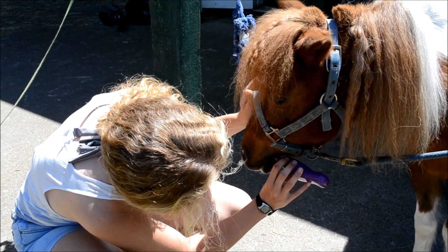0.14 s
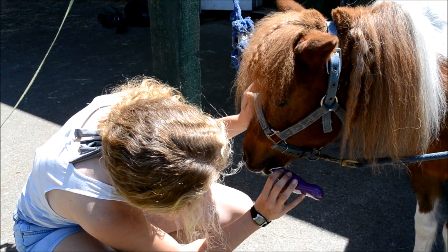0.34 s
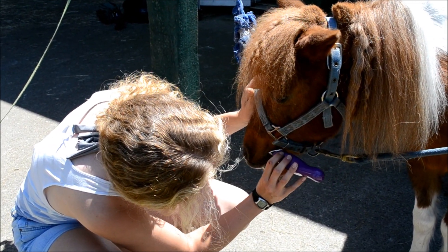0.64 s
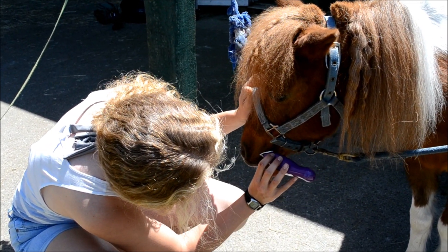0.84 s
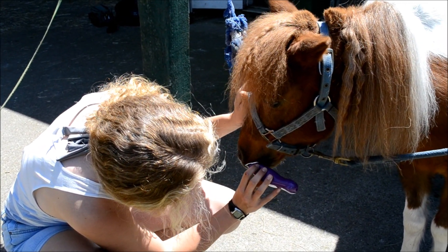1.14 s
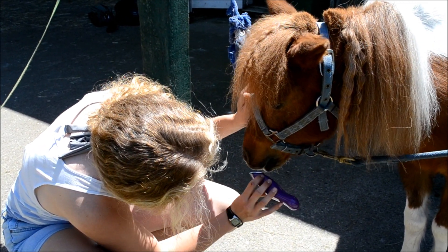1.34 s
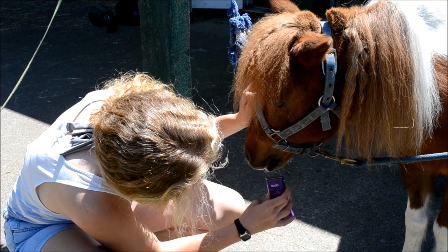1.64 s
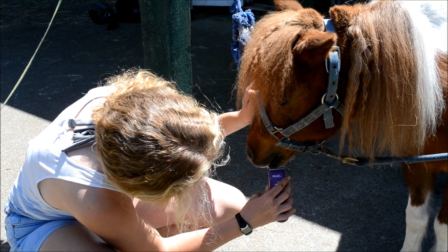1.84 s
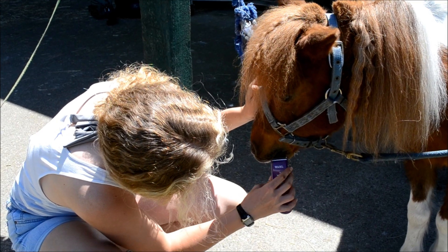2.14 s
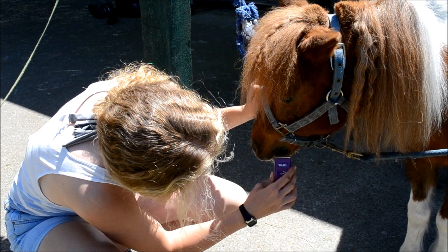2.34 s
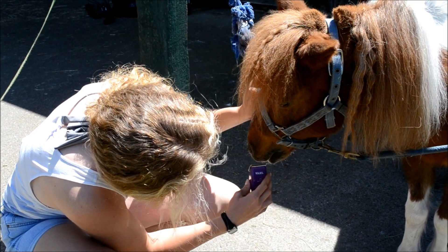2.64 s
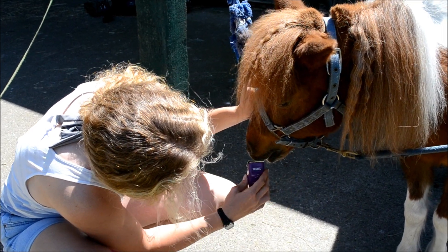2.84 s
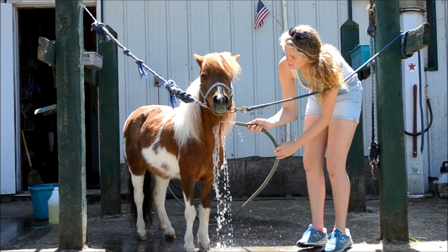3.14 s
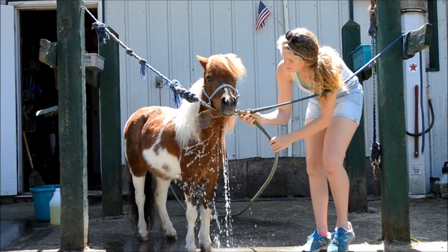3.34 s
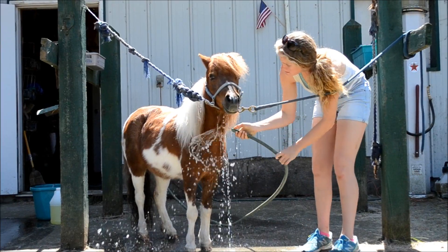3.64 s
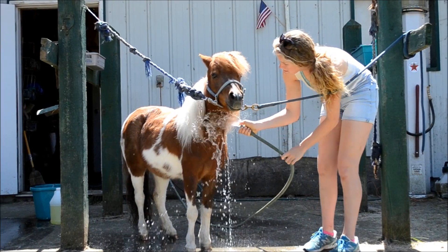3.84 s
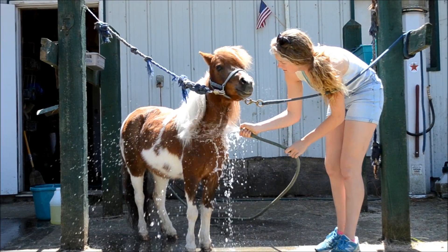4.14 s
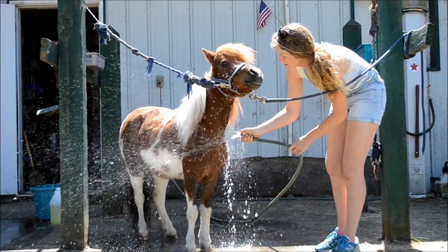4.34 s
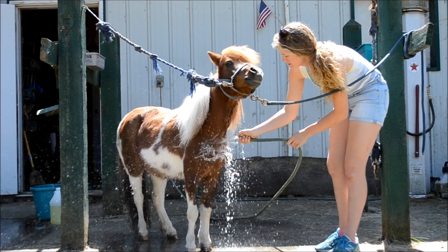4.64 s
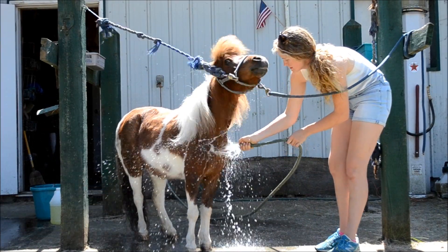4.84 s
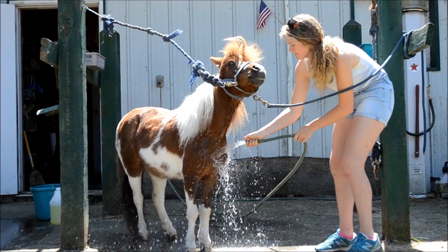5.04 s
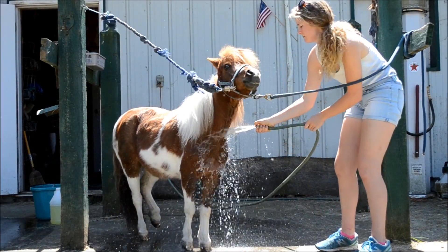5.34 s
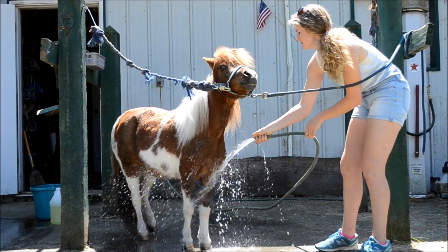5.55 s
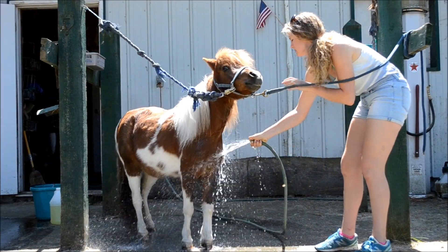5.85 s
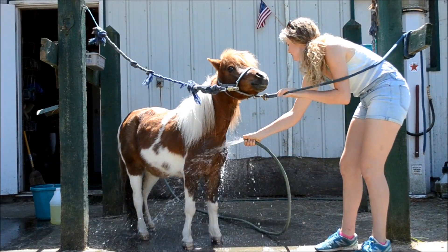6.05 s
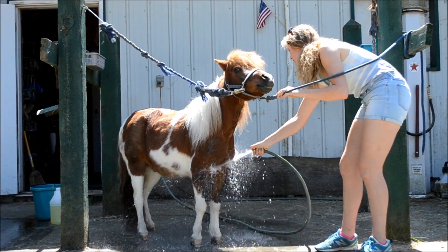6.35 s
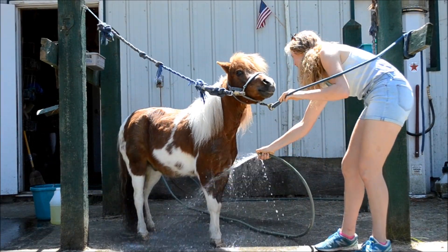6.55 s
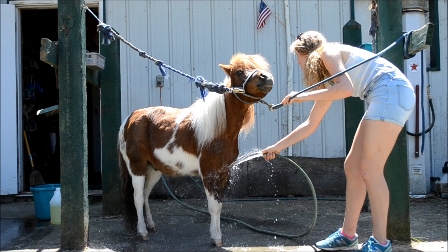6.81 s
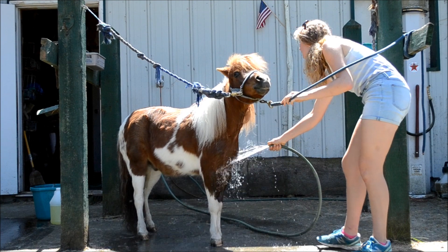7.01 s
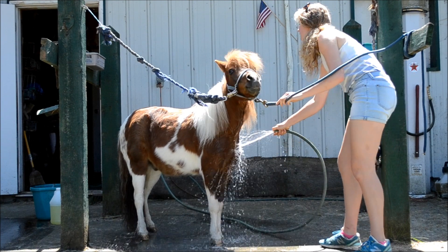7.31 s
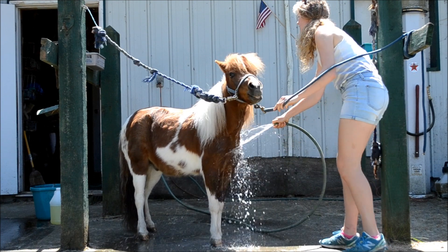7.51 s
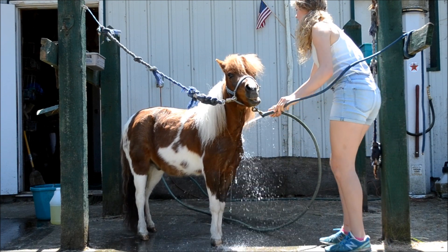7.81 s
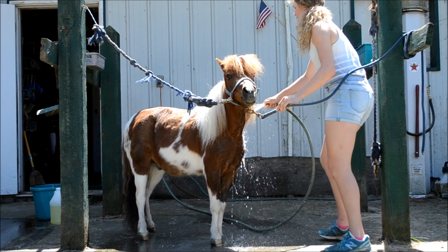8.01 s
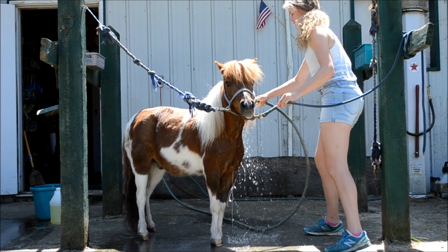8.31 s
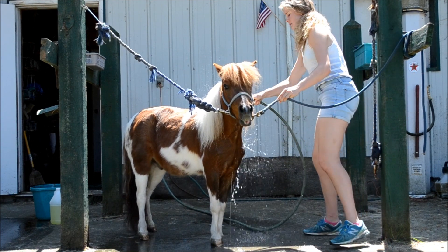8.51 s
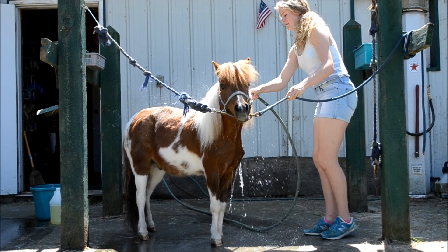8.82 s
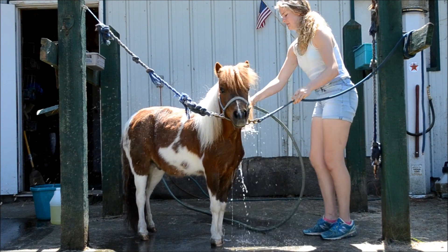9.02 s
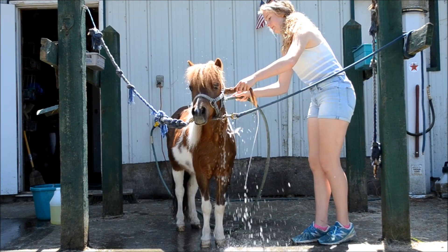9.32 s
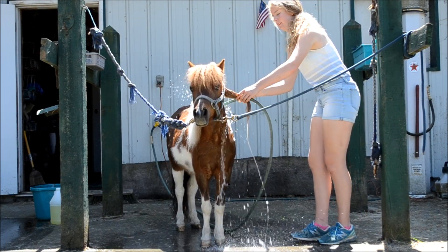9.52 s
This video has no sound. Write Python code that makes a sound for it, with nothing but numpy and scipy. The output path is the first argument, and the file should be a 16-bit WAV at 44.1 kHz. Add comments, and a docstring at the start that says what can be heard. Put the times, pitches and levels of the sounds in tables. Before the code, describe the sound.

Close up, small electric clippers buzz with a steady metallic, nasal tone, brightening when turned upright, with faint rasping snips of hair. At about three seconds a hard cut brings a hose washing a pony outdoors beside a barn: bright spatter, soft drumming on the coat, water slapping concrete. The spray thins later, with a hollow running-water rush, then heavier splashes at the end. Quiet yard noise lies underneath.

```python
"""Small electric clippers buzz at a pony's muzzle, first sideways, then upright: knocks ring the tool, hair rasps.
At about 3 s the scene cuts to the barn's wash stand. A hose drums on the coat and breaks into random droplets;
gouts and sheets of water land as short bursts of noise, with a brief answer from the barn wall. Later come
two soft thuds, a faint distant hum made from one unsteady sine, and the hollow noise of running water.
A quiet yard noise lies under it all."""
import sys
import numpy as np
from scipy import signal
from scipy.fft import rfft, irfft, next_fast_len
from scipy.io import wavfile
from scipy.ndimage import uniform_filter1d, map_coordinates

SR = 44100
rng = np.random.default_rng(int(sys.argv[2]) if len(sys.argv) > 2 else 0)


def unload_wav(signal):
    """Save mono or channel-first audio to the path in sys.argv[1] as 16-bit WAV at rate SR, clipped to [-1, 1]."""
    wavfile.write(
        sys.argv[1],
        SR,
        np.round(np.clip(np.atleast_2d(signal).T, -1, 1) * 32767).astype(np.int16),
    )


N = 426447

CUT_S = 2.975  # the clippers give way to the hose
# how fast the blade goes back and forth: start_s, strokes_hz
STROKE_RATE = [(0.0, 105.6), (0.27, 106.7), (0.42, 107.1), (0.93, 106.1), (1.08, 106.3), (1.91, 107.1),
               (1.95, 106.5), (2.09, 106.9), (2.15, 106.1), (2.37, 107), (2.97, 106.8)]
FIRST_RATE_HZ = STROKE_RATE[0][1]
# level of the spray that the jet throws up: start_s, level_db
SPRAY_FLOW = [(2.98, -44.5), (3.4, -45), (3.76, -48.5), (4.3, -42), (4.58, -47), (4.9, -41.5), (5.36, -45),
              (5.47, -48), (5.52, -50.5), (5.66, -42.5), (6.0, -46.5), (6.45, -45.5), (6.86, -53.5),
              (6.98, -53.5), (7.3, -47.5), (7.7, -48.5), (7.84, -54.5), (8.33, -50.5), (8.8, -55),
              (9.35, -49), (9.66, -50.5)]


def amp(db):
    """Turn decibels into a gain."""
    return 10 ** (np.asarray(db) / 20)


def unit(x):
    """Scale a sound to an average (rms) level of 1."""
    return x / np.sqrt(np.mean(x ** 2) + 1e-20)


def steady(x, seconds):
    """Even a sound out to a running rms of 1."""
    power = np.abs(uniform_filter1d(x ** 2, int(seconds * SR)))
    return x / np.sqrt(power + 1e-12)


def along(points, hz):
    """Read a curve of (pitch_hz, value) points, with pitch on a log scale."""
    point_hz, value = np.transpose(points)
    return np.interp(np.log(hz + 1), np.log(point_hz + 1), value)


def clock():
    """Time of every sample in seconds."""
    return np.arange(N) / SR


def curves(rows):
    """Join the rows of a table into one smooth-running value per sample for each column after the time."""
    start_s, *columns = np.transpose(rows)
    return [np.interp(clock(), start_s, column) for column in columns]


def wobble(rate):
    """A smooth random curve that passes through `rate` random points a second."""
    knots = rng.standard_normal(4096)
    position = np.arange(0, N, 8) * rate / SR
    return np.repeat(map_coordinates(knots, [position], mode="wrap"), 8)[:N]


def filtered(x, response):
    """Multiply each frequency of a sound by a gain."""
    size = next_fast_len(N + 8192)
    gain = response(np.fft.rfftfreq(size, 1 / SR))
    return irfft(rfft(x, size) * gain, size)[:N]


def coloured(x, spectrum):
    """Shape a sound by a spectrum, then set its rms to 1."""
    return unit(filtered(x, lambda hz: amp(along(spectrum, hz))))


def noise(spectrum):
    """Random noise with a given spectrum, at rms 1."""
    return coloured(rng.standard_normal(N), spectrum)


def add(track, start_s, sound):
    """Mix a sound into a track."""
    part = track[round(start_s * SR):][:len(sound)]
    part += sound[:len(part)]


def swell(middle_s, length_s):
    """A smooth rise and fall that peaks at 1."""
    return np.exp(-np.minimum((2 * (clock() - middle_s) / length_s) ** 2, 60))


def burst(pitch_hz, width, t60, tail_db, tail_t60):
    """A sharp smack of peak 1 made of fading, band-filtered noise, with a brighter crackling tail."""
    t = np.arange(4096) / SR
    hz = np.fft.rfftfreq(len(t), 1 / SR)

    def band(centre, spread):
        return 1j * hz * spread * centre / (centre * centre - hz * hz + 1j * hz * spread * centre)

    smack, tail, grain = rng.standard_normal((3, len(t)))
    fading_noise = smack * amp(-60 * t / t60)  # 60 dB down after t60 seconds
    smack = irfft(rfft(fading_noise) * band(pitch_hz, width) * band(pitch_hz, 0.84))
    tail = unit(irfft(rfft(tail * amp(1.3 * grain)) * band(1.15 * pitch_hz, 0.57) ** 2))
    return smack / np.abs(smack).max() + amp(tail_db - 60 * t / tail_t60) * tail


def stroke_phases(ring_s, return_db, return_share):
    """Phases of one cycle: the blade knocks at the end of its stroke and more softly on its way back."""
    cycle = np.arange(4096) / 4096

    def ring(start):
        return np.exp(-((cycle - start) % 1) / (ring_s * FIRST_RATE_HZ))

    knocks = ring(0) + amp(return_db) * ring(return_share)
    return np.angle(rfft(knocks * rng.standard_normal(len(cycle))))


def facing_away(upright, edge_on):
    """1 while a part is edge-on, below 0 in the lobe where its other side beams out."""
    width = 0.043  # half-width, in pose from 0 to 1
    lobe_pose, lobe_share = 0.12, 0.28  # how far past edge-on, and share of the edge-on change

    def bump(pose):
        return np.exp(-((upright - pose) / width) ** 2)

    return bump(edge_on) - lobe_share * bump(edge_on + lobe_pose)


def fading(buzz, moving):
    """Each harmonic swells and fades on its own as the tool moves, faster in a brisk move."""
    depth_db, fades_per_s = 2.2, 3.5  # random depth; rate at the average movement
    hz, t, z = signal.stft(buzz, SR, nperseg=2048)
    pace = moving / moving[:round(CUT_S * SR)].mean()
    travel = np.interp(t, clock(), np.cumsum(pace) / SR)
    place = np.meshgrid(hz / FIRST_RATE_HZ, fades_per_s * travel, indexing="ij")
    field = map_coordinates(rng.standard_normal((256, 128)), place, mode="wrap", order=2)
    faded = signal.istft(z * amp(depth_db * field), SR, nperseg=2048)[1][:N]
    return unit(faded) * buzz.std()


def hair(turns, upright):
    """Hair is sheared once a stroke: a faint noisy rasp that swells at every whisker."""
    # whiskers snipped: middle_s, level_db, length_s
    snips = [(0.027, -50, 0.069), (0.108, -46, 0.03), (0.203, -53, 0.1), (0.24, -53, 0.028),
             (0.54, -51, 0.04), (0.802, -50, 0.053), (0.871, -50, 0.04), (0.936, -54, 0.028),
             (.99, -54, .03), (1.225, -52, 0.042), (2.144, -52, 0.022), (2.192, -49, .03),
             (2.255, -57, .03)]
    # colour of the rasp: pitch_hz, level_db (per Hz)
    hair_colour = [(400, -24), (1000, -3), (1700, 4.5), (2400, -3), (3300, -0.5), (4500, -10),
                   (7000, -14.5), (11000, -28)]
    rasp = amp(-56.5 - 6.5 * upright)
    cutting = rasp + sum(amp(db) * swell(s, length) for s, db, length in snips)
    shear = unit(0.69 + np.exp(-(turns % 1) / 0.87)) * amp(1.4 * wobble(150))
    out = cutting * shear * noise(hair_colour)
    # one thick whisker snaps
    add(out, 2.2115, amp(-26.5) * burst(2800, width=.3, t60=.007, tail_db=-39.13, tail_t60=.03))
    return out


def clippers():
    """The blade's knocks ring housing and steel; turning the tool changes which parts face the listener."""
    # how the tool is held: start_s, upright (0 sideways to 1 upright)
    pose = [(0, 0.22), (1.33, .33), (1.48, 0.58), (1.56, 0.63), (1.68, 0.75), (1.9, 0.83), (2.42, 0.9),
            (2.58, 0.82), (2.97, .86)]
    # how much the hand moves: start_s, movement (0 still to 1 brisk)
    hand = [(0, 0.41), (1.05, 0.49), (1.42, 0.78), (1.6, 0.88), (1.9, 0.43), (2.3, 0.34), (2.46, 1),
            (2.73, 0.66), (2.92, 0.96)]
    # level of the plastic body's ring: start_s, level_db
    body = [(.1, 1), (.5, 0), (1.0, 1), (1.28, 3.5), (1.5, 1), (1.75, -1.5), (2.1, 1), (2.42, 4.5),
            (2.57, -.5), (2.97, 1.5)]
    # limits of the pitch band that each part rings in: pitch_hz
    part_edges = [50, 1100, 1650, 2400, 3800, 5300, 12000]
    # motor, housing, cover, blade, comb, teeth: sideways_db, upright_db, brisk_move_db,
    # body_share (of the body's ring), edge_on (pose), edge_on_db (level change when edge-on)
    parts = [(-54, -52.5, -0.5, 0, .5, 2), (-39, -51.5, 0, 0.96, .5, 2),
             (-41.5, -51, 1, 0.57, 0.646, -11.5), (-48, -47.5, 3, 0.38, 0.543, -5),
             (-62, -57.5, 11.5, 0, 0.6, -2), (-56.5, -56, 1.5, 0, 0.725, -3.5)]
    # ring of the housing in each pose: multiple (of the stroke rate), level_db
    sideways_ring = [(1, -27), (2, -43), (3, -22), (4, -20), (5, -21), (6, -15.5), (7, -1), (8, -12),
                     (9, -26), (10, -7.5), (11, 2.5), (12, 12), (13, 12), (14, 14.5), (15, 7), (16, -5),
                     (17, -3.5), (18, 7.5), (19, -16), (20, -18), (21, -27), (22, -33), (23, -18), (24, -9),
                     (25, -30), (26, -7), (27, -0.5), (28, -6), (29, -9), (30, -21), (31, 4.5), (32, -5)]
    upright_ring = [(1, -26.5), (2, -29), (3, -16), (4, -28), (5, -16), (6, -11), (7, 1), (8, -9), (9, 0.5),
                    (10, -24), (11, 3), (12, 4.5), (13, -6), (14, 11.5), (15, 11), (16, 12), (17, 11.5),
                    (18, 15.5), (19, 13.5), (20, 16.5), (21, 15), (22, -17), (23, -10.5), (24, -10),
                    (25, -12), (26, -9.5), (27, -1.5), (28, -5), (29, -4.5), (30, -6.5), (31, 2), (32, 1.5)]
    # ring of the steel above that in each pose: pitch_hz, level_db
    sideways_steel = [(3450, 1), (3750, -11), (4100, -30), (4300, -32), (4560, -13), (4690, -9),
                      (4900, -35), (5250, -14), (5700, -37), (6300, -19), (6850, -33), (7130, -18),
                      (7500, -27), (9500, -25.5)]
    upright_steel = [(3450, -10), (3950, -10.5), (4290, 0.5), (4530, -26), (4900, -10), (5350, -26.5),
                     (5900, -14), (6200, -18.5), (6900, -18), (7400, -33), (8750, -23.5), (9100, -25),
                     (9500, -22), (11000, -28)]

    rate, upright = curves(STROKE_RATE)[0], np.clip(curves(pose)[0], 0, 1)
    moving, body_db = curves(hand)[0], curves(body)[0]
    live = clock() < CUT_S + .1
    # strokes so far, with a little unsteadiness
    turns = np.cumsum(rate * (1 + .0004 * wobble(20))) / SR + .00017 * wobble(110)
    phases = stroke_phases(ring_s=.0017, return_db=-6, return_share=.72)
    k = np.arange(len(phases))
    hz = k * FIRST_RATE_HZ
    # reflections off muzzle, hand and ground, whose paths drift most while the tool moves
    echoes = []
    for delay_s in (.0007, .0016, .0029):
        path_s = delay_s + .00008 * moving * wobble(4.5)
        echoes.append((turns - rate * path_s)[live])

    def read(cycle, at):
        return np.interp(at % 1, np.arange(len(cycle)) / len(cycle), cycle)

    poses = ((sideways_ring, sideways_steel, 1 - upright), (upright_ring, upright_steel, upright))
    buzz = np.zeros(N)
    for lo, hi, row in zip(part_edges, part_edges[1:], parts):
        side_db, up_db, move_db, body_share, edge_on, edge_on_db = row
        facing_db = side_db + (up_db - side_db) * upright + edge_on_db * facing_away(upright, edge_on)
        level_db = facing_db + move_db * moving + body_share * body_db
        # each part takes the knock at its own point of the cycle
        lag = .07 * np.log2(lo / part_edges[3])
        reflect = .37 * min(lo / part_edges[3], 1)  # low parts reflect less
        part = 0
        for housing, steel, share in poses:
            order, order_db = np.transpose(housing)
            ring_db = np.where(k <= order[-1], np.interp(k, order, order_db), along(steel, hz))
            in_band = (hz >= lo) * (hz < hi)
            cycle = irfft(amp(ring_db) * in_band * np.exp(1j * (phases - 2 * np.pi * k * lag)))
            reflected = sum(read(cycle, echo) for echo in echoes)
            part = part + share[live] * unit(read(cycle, turns[live]) + reflect * reflected)
        buzz[live] += amp(level_db[live]) * steady(part, .047)
    return fading(buzz, moving) + hair(turns, upright)


def yard(washing):
    """The quiet yard is a slowly wavering noise, 2 dB louder once the washing begins."""
    # colour of the yard: pitch_hz, level_db (per Hz)
    yard_colour = [(25, -23), (50, -12), (80, -4.5), (110, -3), (200, -5.5), (330, -4.5), (600, -5),
                   (1000, -10), (2000, -10.5), (5000, -12), (11000, -21)]
    return amp(-57.5 + 2 * washing + 0.89 * wobble(3.2)) * noise(yard_colour)


def droplets(spectrum, pitch_hz, cycles, spread_db, clump_db, wash_db, count):
    """Many tiny damped rings of unequal size, arriving in clumps over a wash of finer spray."""
    when, pitch, size = rng.random((count, 3)).T
    t = np.arange(160) / SR
    # up to an octave either side of the pitch
    hz = np.clip(pitch_hz * 2 ** (2 * pitch[:, None] - 1), 100, SR / 3)
    size = amp(spread_db * np.minimum(-np.log(1 - size), 3))
    rings = size[:, None] * np.sin(2 * np.pi * hz * t) * np.exp(-hz * t / cycles)
    where = (when * N).astype(int)[:, None] + np.arange(len(t))
    grains = coloured(np.bincount(where.ravel(), rings.ravel(), N)[:N], spectrum)
    return steady(amp(clump_db) * (grains + amp(wash_db) * noise(spectrum)), 0.089)


def spray():
    """The jet drums on the coat and breaks up into splash, spatter and fine mist; sweeps and gushes swell it."""
    # the jet sweeps across the wet coat: middle_s, level_db, length_s, drum_db (drumming against splash)
    sweeps = [(3.193, -49.5, 0.037, -16), (3.32, -43.5, 0.04, -16), (3.854, -68, .06, -18),
              (4.23, -47, 0.15, -9), (4.43, -54, 0.16, -5.5), (4.906, -45, 0.075, -14),
              (5.068, -53.5, 0.18, -11), (5.342, -49.5, 0.2, -10), (5.678, -60, 0.094, 5.5),
              (5.872, -46.5, 0.15, -12), (6.09, -48, 0.22, -7), (6.306, -43, 0.13, -7),
              (6.746, -53.5, 0.2, -6), (7.123, -51.5, 0.27, -12), (7.302, -59.5, 0.21, -9),
              (7.542, -48, 0.071, -13), (7.65, -52.5, 0.11, -6), (8.103, -54, 0.36, -11),
              (8.39, -60, 0.13, -2), (8.66, -58, 0.3, -6), (8.91, -53, 0.38, -9),
              (9.137, -50.5, 0.085, -8.5)]
    # the coat sheds a gush onto the concrete: middle_s, level_db, length_s, mist_db (against spatter)
    gushes = [(3.218, -39, 0.054, -13), (3.264, -36, 0.023, 1), (3.866, -39.5, 0.066, -3.5),
              (4.315, -38, 0.037, -10), (4.782, -39, 0.056, -8), (5.025, -49, .04, 9),
              (5.105, -40.5, 0.049, -1), (5.266, -41, 0.066, -4), (5.434, -44.5, 0.11, 4.5),
              (5.61, -47.5, 0.1, 7.5), (5.714, -50, 0.087, 7), (6.12, -43.5, 0.14, 4.5),
              (6.32, -43.5, 0.13, 4), (6.532, -42, 0.058, 3.5), (6.75, -58, 0.031, 16),
              (7.383, -56, 0.056, 13.5), (7.597, -45.5, 0.085, 0), (7.776, -42.5, 0.043, 0),
              (7.895, -50.5, 0.047, 3), (8.01, -45, .05, -5), (8.407, -43, 0.054, -4),
              (8.664, -44, 0.1, -3), (8.963, -51, 0.089, -4), (9.226, -46.5, 0.12, 0),
              (9.368, -40.5, 0.12, -2), (9.556, -43.5, 0.027, 2), (9.643, -38, 0.035, 0)]
    # colours of the drumming and the three kinds of drop: pitch_hz, level_db (per Hz)
    drum_colour = [(25, -45), (80, -12), (170, -2.5), (320, -3), (550, 0), (900, -26), (1800, -51)]
    splash_colour = [(100, -55), (350, -29), (650, -11.5), (1050, -5.5), (1700, -3.5), (2400, -7.5),
                     (4000, -15.5)]
    spatter_colour = [(200, -50), (1000, -10), (2000, -7), (2800, 0), (5000, 5), (6500, 5.5), (9000, -10.5)]
    mist_colour = [(800, -61), (3500, -19), (5500, -11.5), (6800, -6.5), (9300, -0.5), (10300, -2),
                   (11500, -4)]
    sweep_spray_db = -6.5  # spray thrown off by a sweep

    flow = amp(curves(SPRAY_FLOW)[0] + 1.33 * wobble(16))
    coat = np.sqrt(sum((amp(db) * swell(s, length)) ** 2 for s, db, length, _ in sweeps))
    flank = sum(amp(db + drum_db) * swell(s, length) for s, db, length, drum_db in sweeps)
    spatter_power = mist_power = flow ** 2 + (amp(sweep_spray_db) * coat) ** 2
    for s, db, length, mist_db in gushes:
        gush = amp(db) * swell(s, length)
        spatter_power = spatter_power + gush ** 2
        mist_power = mist_power + (amp(mist_db) * gush) ** 2
    clumps = wobble(380) + 0.71 * wobble(120)  # drops of all sizes land together

    drum_level = np.hypot(flank, amp(-25.5) * flow) * amp(2.5 * wobble(7.1))
    drum = drum_level * noise(drum_colour)
    splash_level = amp(4.0) * np.hypot(coat, amp(-13.5) * flow)
    splash = splash_level * droplets(splash_colour, pitch_hz=1320, cycles=1.16, spread_db=8,
                                     clump_db=0.83 * clumps, wash_db=4.5, count=9000)
    spatter_level = amp(0.5) * np.sqrt(spatter_power)
    spatter = spatter_level * droplets(spatter_colour, pitch_hz=3730, cycles=2.16, spread_db=5.0,
                                       clump_db=2.63 * clumps, wash_db=-2.0, count=5500)
    mist_level = amp(2.5) * np.sqrt(mist_power)
    mist = mist_level * droplets(mist_colour, pitch_hz=7080, cycles=2.2, spread_db=5.0,
                                 clump_db=1.93 * clumps, wash_db=0, count=14000)
    return drum + splash + spatter + mist


def small_gouts(count):
    """Lesser gouts land at random, harder when there is more spray: start_s, peak_db, pitch_hz."""
    mean_db, follows = -27.5, 0.91  # mean peak, and dB per dB of spray
    middle_hz, octaves = 5260, 0.55  # pitch, and its spread either way
    when, pitch = rng.random((count, 2)).T
    start_s = CUT_S + when * (N / SR - CUT_S)
    flow_db = np.interp(start_s, *np.transpose(SPRAY_FLOW))
    peak_db = mean_db + follows * (flow_db - flow_db.mean())
    return list(zip(start_s, peak_db, middle_hz * 2 ** (octaves * (2 * pitch - 1))))


def slaps():
    """Water running off the pony lands in gouts, each with a duller thump and a throw of droplets."""
    # big gouts slapping the concrete: start_s, peak_db (of the smack), pitch_hz
    big_gouts = [(2.9934, -22.5, 2065), (3.1038, -22.5, 3730), (3.1752, -24, 8830), (3.1903, -22, 6600),
                 (3.257, -25, 6680), (3.303, -23.5, 2930), (3.3215, -15.5, 6750), (3.384, -18, 8550),
                 (3.481, -21.5, 6960), (3.5667, -16.5, 9900), (3.5909, -21.5, 3180), (3.6479, -16.5, 5800),
                 (3.695, -18, 6400), (3.7395, -17.5, 5570), (3.7723, -22, 7110), (3.8066, -17.5, 8900),
                 (3.8185, -13.5, 3000), (3.877, -23, 2600), (3.903, -18.5, 5230), (3.9706, -19, 6170),
                 (4.0157, -24, 2760), (4.0647, -22, 8480), (4.1074, -23, 4850), (4.1632, -18, 2390),
                 (4.2078, -27, 2980), (4.2676, -17, 8850), (4.3118, -19, 2370), (4.4407, -16.5, 5300),
                 (4.562, -16.5, 9100), (4.638, -23.5, 4820), (4.7621, -19, 6940), (4.79, -19.5, 6200),
                 (4.8474, -19, 5240), (4.9437, -20.5, 2800), (4.996, -22.5, 2350), (5.0888, -19, 5000),
                 (5.1822, -18, 3760), (5.231, -21, 4930), (5.3278, -18, 8660), (5.7279, -17.5, 5030),
                 (5.8034, -25, 3870), (6.1676, -24.5, 4280), (6.363, -24, 2850), (6.509, -19.5, 6240),
                 (6.9365, -28.5, 3130), (7.4467, -22, 8800), (7.575, -18, 2140), (7.584, -19.5, 2870),
                 (7.5996, -22.5, 3480), (7.7533, -26.5, 2800), (7.895, -24, 5860), (8.079, -25, 3140),
                 (8.209, -21.5, 5000), (8.262, -24.5, 3000), (8.307, -23, 4000), (8.3285, -23, 5430),
                 (8.3697, -21.5, 5830), (8.6367, -18.5, 3560), (8.7345, -23.5, 8400), (8.7997, -28, 6970),
                 (8.9366, -20.5, 7500), (8.963, -19, 4200), (8.9776, -19.5, 2730), (9.212, -20, 2630),
                 (9.2936, -17, 6640), (9.314, -17.5, 9370), (9.3633, -14.5, 3740), (9.387, -15, 8840),
                 (9.4485, -16, 6500), (9.4548, -16.5, 4740), (9.528, -11.5, 3860), (9.605, -22, 6050)]
    out = np.zeros(N)
    for s, db, pitch_hz in big_gouts + small_gouts(count=55):
        # the crackling tail is the throw of droplets
        smack = burst(pitch_hz, width=0.51, t60=0.0065, tail_db=-18.63, tail_t60=0.024)
        thump = burst(.5 * pitch_hz, width=0.32, t60=0.0074, tail_db=-47.13, tail_t60=.03)
        add(out, s + .0006, amp(db) * (smack + amp(-16.5) * thump))
    return out


def swashes():
    """Sheets of water hit wet hair and puddles with a hollow, crackling swish of noise."""
    # sheets of water: middle_s, level_db, pitch_hz, length_s
    sheets = [(2.996, -41, 1875, 0.024), (3.821, -31, 2200, 0.0051), (3.843, -35, 2930, 0.0081),
              (4.105, -36, 1930, 0.0061), (4.738, -46, 2090, 0.085), (5.187, -50.5, 735, 0.05),
              (5.565, -43.5, 1080, 0.027), (5.744, -33, 2900, 0.0086), (6.524, -39, 5100, .025),
              (7.586, -44, 1910, 0.014), (9.529, -45, 1800, .02)]
    out = np.zeros(N)
    t = np.arange(SR) / SR - .5
    hz = np.fft.rfftfreq(SR, 1 / SR)
    for s, db, pitch_hz, length in sheets:
        hollow = 1 / (1 + (3.2 * (hz - pitch_hz) / pitch_hz) ** 2)
        crackle = rng.standard_normal(SR) * amp(5 * rng.standard_normal(SR))
        swish = unit(irfft(rfft(crackle) * hollow))
        add(out, s - .5, amp(db) * np.exp(-(2 * t / length) ** 2) * swish)
    return out


def barn(x):
    """The wall answers 6 ms late with a noisy tail in which each frequency dies at its own speed."""
    # time to fall by 60 dB: pitch_hz, t60_s
    decay = [(200, 0.21), (2000, 0.28), (10000, 0.08)]
    hz, t, z = signal.stft(rng.standard_normal(SR // 2), SR, nperseg=256)
    dying = z * amp(-60 * t / along(decay, hz)[:, None])
    tail = signal.istft(dying, SR, nperseg=256)[1]
    late = np.pad(x, (round(.006 * SR), 0))
    return signal.fftconvolve(late, tail / np.linalg.norm(tail))[:N]


def thuds():
    """Dull, short pushes of low noise that peak after 13 ms and then die away."""
    # soft low thuds: start_s, level_db
    pushes = [(5.29, -56), (5.6, -58)]
    colour = [(20, -24), (55, -3), (100, -1), (250, -35), (1000, -80)]  # pitch_hz, level_db (per Hz)
    level = 0
    for s, db in pushes:
        age = np.maximum(clock() - s, 0) / 0.013
        level = level + amp(db) * age * np.exp(1 - age)
    return level * noise(colour)


def hum():
    """Something far off drones on one slightly unsteady note, a plain sine."""
    # level of the hum: start_s, level_db
    hum_level = [(6.35, -93), (6.5, -67.5), (7.3, -73), (7.9, -75), (8.6, -70.5), (9.15, -87), (9.25, -95)]
    hz = 236 + 2.0 * wobble(14)
    tone = np.sqrt(2) * np.sin(2 * np.pi * np.cumsum(hz) / SR)
    return amp(curves(hum_level)[0] + 2.4 * wobble(9.1)) * tone


def rush():
    """The stream runs into something hollow until the nozzle swings away: noise gathered around 1 kHz."""
    # level of the rush: start_s, level_db
    rush_level = [(6.98, -73), (7.1, -55), (7.62, -63), (7.85, -64), (8.05, -60), (8.6, -59), (9.0, -58),
                  (9.17, -49), (9.2, -85)]
    # colour of the rush: pitch_hz, level_db (per Hz)
    hollow_colour = [(200, -58), (750, -7.5), (1030, -5), (1300, -12), (4000, -35)]
    return amp(curves(rush_level)[0] + 2.6 * wobble(25)) * noise(hollow_colour)


def scene():
    """Clipping, then washing, over the quiet yard."""
    washing = np.clip((clock() - CUT_S) / 0.011, 0, 1)  # 0 clipping, 1 washing
    gouts = slaps() + swashes()
    wall = amp(-14.0) * barn(gouts)
    wash_stand = spray() + gouts + wall + thuds() + hum() + rush()
    return ((1 - washing) * clippers() + washing * wash_stand + yard(washing))[None]


def record(dry):
    """The microphone has a notch in the treble and a steep band limit."""
    # the microphone's response: pitch_hz, gain_db
    microphone = [(20, -4), (7400, 1), (7900, -5.5), (8450, 2.5), (10000, -0.5), (10900, -7), (11500, -21),
                  (11900, -49)]
    top_hz = 11967
    return filtered(dry[0], lambda hz: amp(along(microphone, hz)) * (hz < top_hz))[None]


dry = scene()
out = record(dry)
unload_wav(out)
```